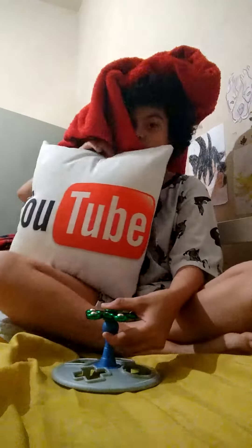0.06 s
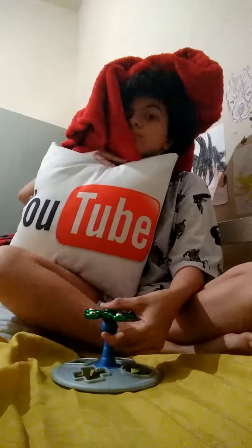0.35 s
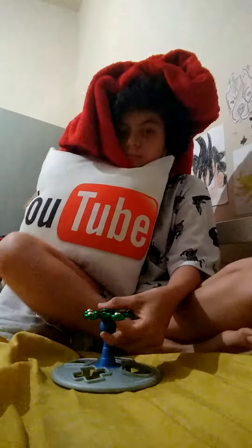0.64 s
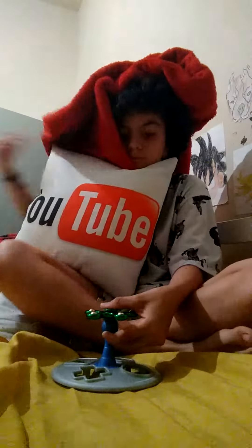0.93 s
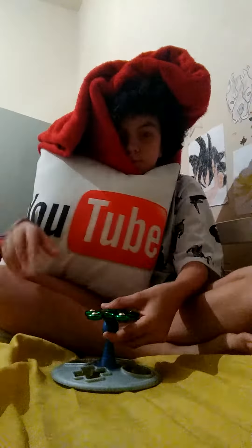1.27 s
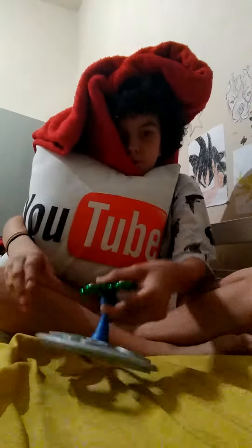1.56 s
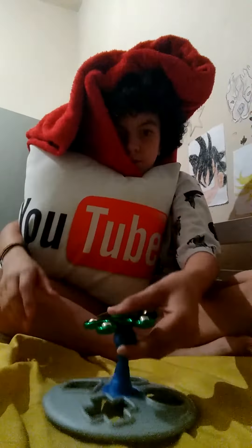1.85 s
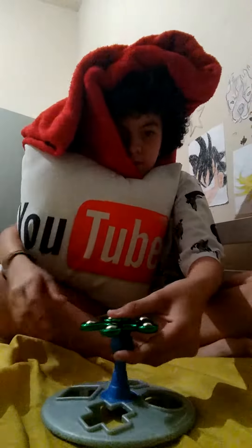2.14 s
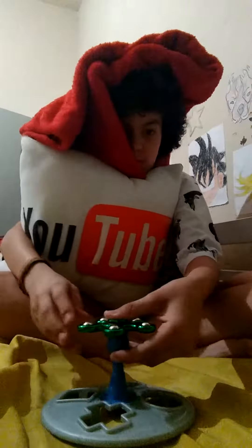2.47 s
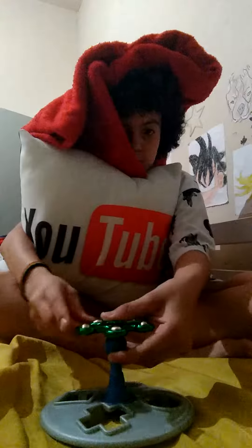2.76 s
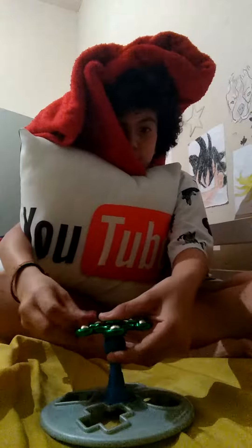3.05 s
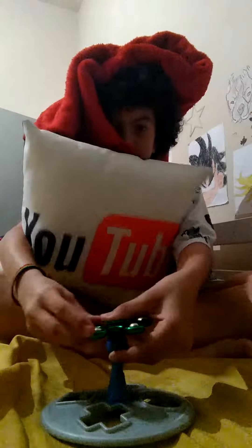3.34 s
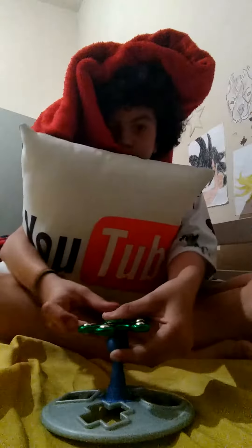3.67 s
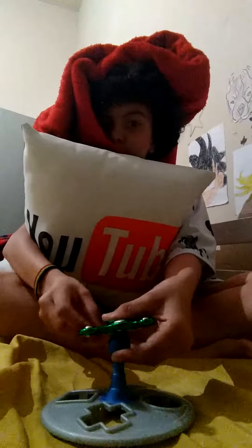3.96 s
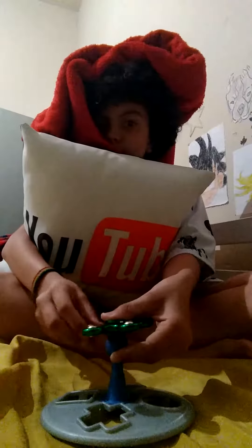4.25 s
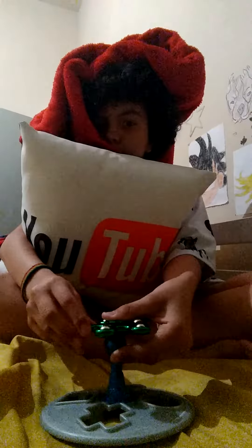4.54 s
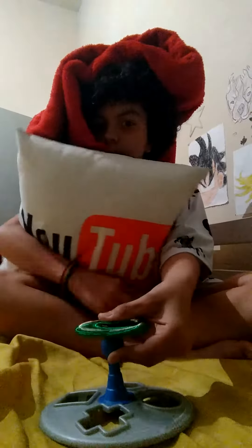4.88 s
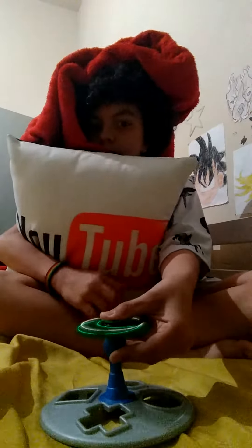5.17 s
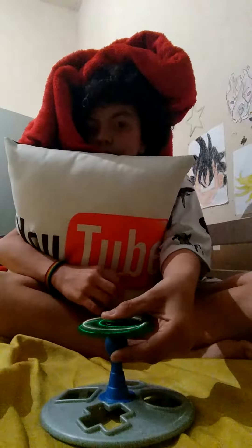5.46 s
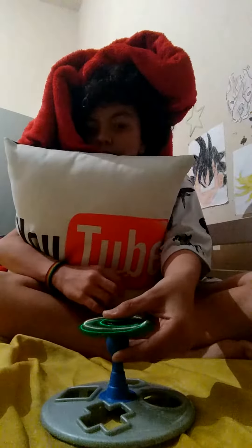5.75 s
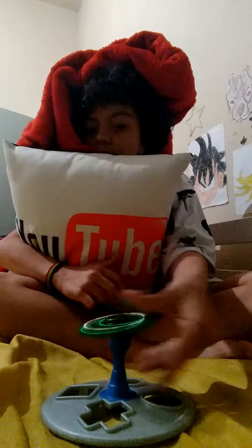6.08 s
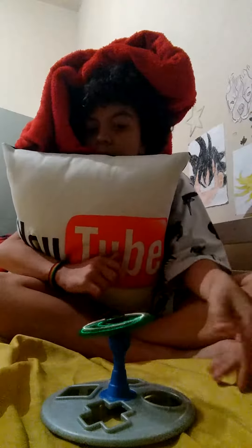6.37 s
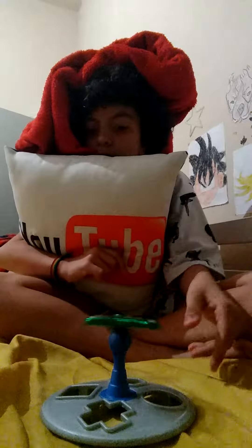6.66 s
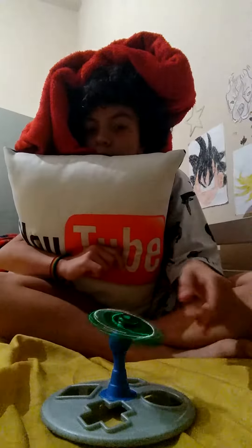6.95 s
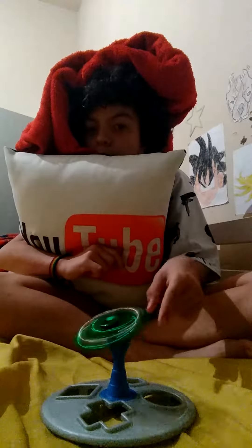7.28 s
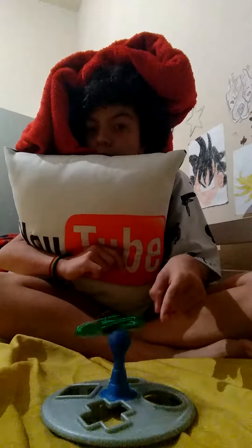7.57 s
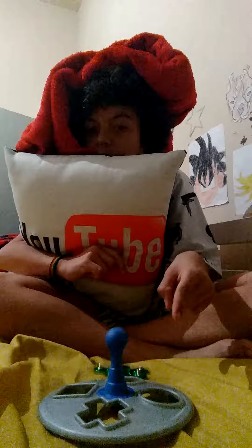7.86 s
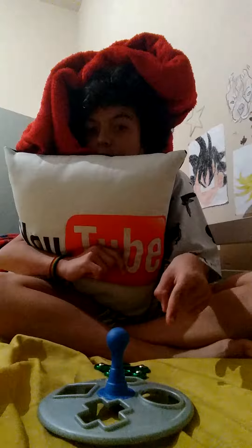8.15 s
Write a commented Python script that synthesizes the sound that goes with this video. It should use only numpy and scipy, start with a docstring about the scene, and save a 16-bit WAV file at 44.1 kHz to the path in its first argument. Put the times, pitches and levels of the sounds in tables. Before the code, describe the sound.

In a quiet bedroom with a faint hum, fabric rustles softly and fingers tick lightly on metal, with a few dull bumps. A flick sets a fidget spinner whirring, its bearing rattling with a thin steely ring. After about three seconds it rumbles, drops off its stand and bounces on the plastic base with sharp, loud clacks. The microphone is close.

```python
"""A metal fidget spinner whirrs on a plastic peg stand, on a bed in a quiet bedroom.
Cloth rustles and fingers tick on the metal, then a flick sets the ball bearing rattling and ringing.
Let go, the spinner leans, rumbles, slips off the peg and clacks onto the plastic base.
A phone close by spreads its one microphone to stereo with a short, inverted delay."""
import sys
import numpy as np
from scipy import signal
from scipy.fft import rfft, irfft, next_fast_len
from scipy.io import wavfile

SR = 44100
rng = np.random.default_rng(int(sys.argv[2]) if len(sys.argv) > 2 else 0)


def inscribe(sig):
    """Save sig as 16-bit PCM at rate SR to the path in sys.argv[1].

    A 1-D sig is mono; a 2-D sig holds one channel per row.
    Samples are clipped to [-1, 1] before scaling.
    """
    pcm = np.round(np.clip(np.atleast_2d(sig).T, -1, 1) * 32767)
    wavfile.write(sys.argv[1], SR, pcm.astype(np.int16))


N = 362502
T = np.arange(N) / SR
FLICK_S, FALL_S = 4.685, 7.575  # the spin starts; the spinner leaves the peg


def undb(db):
    """Decibels to gain."""
    return 10 ** (np.asarray(db) / 20)


def unit(x):
    """Scale to rms 1."""
    return x / np.sqrt(np.mean(x ** 2))


def curve(table):
    """Automation line through (time, value) points."""
    return np.interp(T, *np.transpose(table))


def colour(x, points):
    """EQ through (f/Hz, level/dB) points, falling 20 dB an octave beyond the ends."""
    hz, db = np.transpose(points)
    size = next_fast_len(len(x))
    f = np.maximum(np.fft.rfftfreq(size, 1 / SR), 1)
    gain_db = np.interp(np.log(f), np.log(hz), db)
    beyond = np.maximum(np.log2(hz[0] / f), 0) + np.maximum(np.log2(f / hz[-1]), 0)
    return irfft(rfft(x, size) * undb(gain_db - 20 * beyond), size)[:len(x)]


def resonate(x, hz, width):
    """One resonance, gain 1 at its centre."""
    return signal.lfilter(*signal.iirpeak(hz, hz / width, SR), x)


def walk(rate):
    """Random drift of rms 1, with `rate` new targets a second."""
    knots = rng.standard_normal(int(N / SR * rate) + 2)
    return unit(np.interp(T * rate, np.arange(len(knots)), knots))


def grains(rate, spread_db):
    """Tiny contacts of uneven size, about `rate` a second."""
    hits = rng.random(N) < rate / SR
    return unit(hits * rng.standard_normal(N) * undb(spread_db * rng.standard_normal(N)))


def burst(x, decay_s):
    """Let a sound die away from a starting rms of 1."""
    x = x * np.exp(-T[:len(x)] / decay_s)
    return x / np.sqrt(np.sum(x ** 2) / (decay_s * SR / 2))


def add(out, s, x):
    """Mix a short sound in at time s."""
    i = int(s * SR)
    out[i:i + len(x)] += x[:N - i]


# noise floor of the bedroom air: f/Hz, density/dB per Hz
AIR_SPECTRUM = [(25, -105), (60, -99), (100, -92), (160, -87), (250, -88), (350, -94), (600, -102),
                (1000, -105.5), (1800, -108), (3500, -107.3), (6000, -110), (9000, -113.5), (15000, -116)]
# appliance hum: f/Hz, level/dB
HUM_TONES = [(120.2, -66), (177.6, -68.5), (238.8, -64), (6420, -90)]
# a far-off tone that comes and goes: t/s, length/s, f/Hz, level/dB
FAR_SWELLS = [(.5, 0.4, 332, -63), (3.328, 0.47, 334, -65)]


def room_tone():
    """Faint air, the wavering hum of an appliance and a far-off tone."""
    out = colour(rng.standard_normal(N), AIR_SPECTRUM) * np.sqrt(SR / 2)
    for hz, db in HUM_TONES:
        out += np.sqrt(2) * undb(db + 1.2 * walk(7)) * np.sin(2 * np.pi * hz * T + .4 * walk(6))
    for s, length, hz, db in FAR_SWELLS:
        t = T[:int(length * SR)]
        add(out, s, np.sqrt(2) * undb(db) * np.sin(np.pi * t / length) * np.sin(2 * np.pi * hz * t))
    return out


# tone of the room's tail: f/Hz, level/dB
REVERB_EQ = [(60, 8), (180, 1.5), (500, -4), (1500, -6.5), (4000, -2.5), (8000, -6), (15000, -1)]


def bedroom(x, t60=.28, wet_db=-12, build_s=.011):
    """A small, padded room: the walls answer briefly."""
    t = T[:SR // 2]
    envelope = np.exp(-np.log(1000) * t / t60) * (1 - np.exp(-(t / build_s) ** 2))
    tail = colour(rng.standard_normal(len(t)), REVERB_EQ) * envelope
    return x + undb(wet_db) * signal.fftconvolve(x, tail / np.sqrt(np.sum(tail ** 2)))[:N]


# dull rub and bright swish of fabric: f/Hz, level/dB
RUB_EQ = [(50, -10.5), (130, -1), (330, 4), (600, 1), (1000, -7.5), (1500, -12.5), (3000, -26.5)]
SWISH_EQ = [(700, -11), (1800, 0.5), (3000, -3.5), (4500, -2.5), (6500, -10), (9000, -10.5), (15000, -19)]
# shifts of sleeves, pillow and blanket: centre t/s, length/s, rub level/dB, swish level/dB
CLOTH_MOVES = [(0.187, 0.23, -68, -66), (.365, 0.12, -60, -76), (0.676, 0.28, -63, -67),
               (0.827, .17, -66.5, -63.5), (1.15, 0.19, -63, -71), (1.53, .26, -70, -67.5),
               (1.774, 0.17, -60.5, -63.5), (2.075, 0.34, -69.5, -68.5), (2.43, 0.28, -64, -69.5),
               (3.04, .15, -61, -68), (3.24, 0.27, -58, -65.5), (3.534, 0.14, -61.5, -74),
               (3.78, .3, -68, -72.5), (4.76, .2, -58, -61), (7.82, 0.19, -58.5, -61),
               (8.17, 0.45, -66, -68)]


def cloth(stir_rub_db=-71.5, stir_swish_db=-75, still_s=3.9, settle_s=.2):
    """Fibres catch and slip as limbs shift, over a faint stirring that settles before the flick."""
    stir = undb(2 * walk(5)) * np.exp(-np.maximum(T - still_s, 0) / settle_s)
    rub_gain, swish_gain = stir * undb(stir_rub_db), stir * undb(stir_swish_db)
    for s, length, rub_db, swish_db in CLOTH_MOVES:
        swell = np.cos(np.pi * np.clip((T - s) / length, -.5, .5))
        rub_gain = np.hypot(rub_gain, swell * undb(rub_db))
        swish_gain = np.hypot(swish_gain, swell * undb(swish_db))
    rub = unit(colour(grains(2500, 2.9) * undb(-.5 * walk(40)), RUB_EQ))
    swish = unit(colour(grains(9000, 1.9), SWISH_EQ))
    return rub * rub_gain + swish * swish_gain


# soft bumps on stand and mattress: t/s, level/dB, f/Hz
BUMP_CUES = [(.55, -58, 260), (.859, -57, 264), (1.381, -58, 233), (1.728, -51.5, 387), (1.785, -50.5, 140),
             (1.928, -59, 167), (2.859, -54.5, 166), (2.972, -57.5, 160), (3.51, -56, 208),
             (4.705, -45, 142), (4.744, -40.5, 118), (4.906, -42.5, 204), (7.051, -41.5, 171),
             (7.472, -39.5, 165), (7.52, -43, 158), (7.795, -40.5, 186)]


def bumps(width_share=.48, rise_s=.0027, decay_s=.022):
    """Dull, padded knocks that swell and die within a few cycles."""
    out, t = np.zeros(N), T[:SR // 4]
    for s, db, hz in BUMP_CUES:
        width = hz * width_share
        shake = resonate(resonate(rng.standard_normal(len(t)), hz, width), hz, width)
        shake *= (1 - np.exp(-t / rise_s)) * np.exp(-t / decay_s)
        add(out, s, undb(db) * shake / np.sqrt(np.sum(shake ** 2) / (decay_s * SR)))
    return out


# ringing modes of spinner and stand: f/Hz, level/dB, t60/s
RING_MODES = [(953, -3, .11), (1260, -6, .08), (2270, -6, .1), (2735, -7, .12), (3540, -1, .1),
              (3978, -4, .12), (4330, -4, .13), (4770, -3, .1), (6200, -10, .12), (8750, -14, .12)]
# hollow knock of the plastic base: f/Hz, level/dB
BASE_EQ = [(250, -4), (450, 1), (650, -7), (850, -2), (1300, -4), (1700, -14.5), (2200, -3), (3000, -19),
           (5000, -7.5), (9000, -37)]


def impact(db, hz, octaves, decay_s, thud_db, knock_db):
    """One hit: a crack, ringing metal, a knock of the base, a thud as the stand rocks on the mattress."""
    def contact(f, skirt_db=-24, top_hz=10000):
        bell = np.exp(-.5 * (np.log2(f / hz) / octaves) ** 2)
        return (bell + undb(skirt_db)) / np.sqrt(1 + (f / top_hz) ** 6)

    t = T[:SR // 4]
    bins = np.maximum(np.fft.rfftfreq(len(t), 1 / SR), 1)
    grit = unit(irfft(rfft(rng.standard_normal(len(t))) * contact(bins), len(t)))
    chatter = undb(-19) * grit * np.exp(-t / .006)  # the loose bearing buzzes on briefly
    crack = burst(grit, decay_s) + chatter
    ring = np.zeros(len(t))
    for mode_hz, mode_db, t60 in RING_MODES:
        gain = undb(mode_db + 2 * rng.standard_normal()) * contact(mode_hz)  # each hit lands elsewhere
        ring += gain * np.sin(2 * np.pi * (mode_hz * t + rng.random())) * np.exp(-np.log(1000) * t / t60)
    ring *= undb(-25) * np.sqrt(decay_s / .002 / len(RING_MODES))  # a longer push rings harder
    knock = burst(colour(rng.standard_normal(len(t)), BASE_EQ), decay_s=.004)
    thud = np.sin(2 * np.pi * 185 * t) * (1 - np.exp(-t / .003)) ** 2 * np.exp(-t / .0024)
    thud /= np.max(np.abs(thud))
    return undb(db) * (crack + ring) + undb(knock_db) * knock + undb(thud_db) * thud


# fingers touching the spinner: t/s, level/dB, contact f/Hz, knock level/dB
TICK_CUES = [(1.378, -50, 3780, -80), (1.3947, -45, 3300, -68), (1.44, -55, 2400, -53),
             (1.762, -55, 1900, -55), (2.931, -47, 2600, -66), (3.705, -62, 12000, -85),
             (5.768, -49, 10000, -70), (5.933, -38.5, 2800, -52), (5.97, -46, 11000, -70)]


def finger_ticks():
    """Fingers tap the metal: light, short hits."""
    out = np.zeros(N)
    for s, db, hz, knock_db in TICK_CUES:
        add(out, s, impact(db, hz, octaves=.6, decay_s=.0015, thud_db=-63, knock_db=knock_db))
    return out


# hits on peg and base: t/s, level/dB, contact f/Hz, width/octaves, decay/s, thud level/dB, knock level/dB
CLACK_CUES = [(6.232, -49, 3000, 1, .002, -41, -47), (7.5729, -26.5, 3540, 0.41, 0.0038, -32, -36),
              (7.5776, -28, 4170, 1, .003, -15, -30), (7.5923, -4.5, 5280, 1.8, 0.00041, -23.5, -23.5),
              (7.6186, -11.5, 3960, 0.66, 0.0032, -23.5, -21), (7.699, -40, 3470, 1.3, 0.0021, -34.5, -32),
              (7.7119, -9.5, 2330, .3, 0.0016, -33, -13), (7.7178, -24.5, 3600, 1, .002, -21, -31.5),
              (7.7274, -21.5, 2950, 0.44, 0.00066, -39, -25.5),
              (7.736, -27, 3790, 0.66, 0.00685, -39.5, -33)]


def clacks():
    """The spinner knocks once while turning, then drops off the peg and bounces on the base."""
    out = np.zeros(N)
    for s, *hit in CLACK_CUES:
        add(out, s, impact(*hit))
    return out


def spinning(rise_s=.039, run_out_s=.04):
    """Envelope of the spin: fast attack at the flick, a hold, a short release after the fall."""
    return np.clip((T - FLICK_S) / rise_s, 0, 1) * np.exp(-np.maximum(T - FALL_S, 0) / run_out_s)


def slowing(per_s):
    """Share that friction has left since the flick."""
    return np.exp(-per_s * np.maximum(T - FLICK_S, 0))


def moan(start_hz=1031, db=-63):
    """A rough, narrow resonance inside the whirr glides down as the spinner slows."""
    phase = 2 * np.pi * np.cumsum(start_hz * slowing(per_s=.56)) / SR
    band = walk(130) * np.sin(phase) + walk(130) * np.cos(phase)
    return band * undb(db) * spinning()


# resonances of the steel races, ring first, then sizzle: f/Hz, nominal width/Hz, relative level/dB
RACE_MODES = [(4160, 210, 4.5), (7700, 410, -5.5), (12150, 370, 1.5), (12250, 1540, -6.5),
              (15000, 510, 0.5)]


def races(load, ring_db, sizzle_db):
    """Ticking balls excite the races: one steely ring with a sizzle above it."""
    ticks = grains(5000, 1.4) * load * undb(.4 * walk(80))
    ring, *sizzle = (undb(db) * resonate(resonate(ticks, hz, width * 1.75), hz, width * 2.2)
                     for hz, width, db in RACE_MODES)
    return unit(ring) * undb(ring_db) + unit(sum(sizzle)) * undb(sizzle_db)


# bearing rattle when pinched and when free, its hollow body and its rumble: f/Hz, level/dB
HELD_EQ = [(900, -14), (1400, -27), (1700, -10), (2200, -5.5), (2750, -1), (3400, -3.5), (4100, -6),
           (5000, -12.5), (6300, -19.5), (8500, -19.5), (11000, -24.5)]
FREE_EQ = [(900, -27), (1350, -9.5), (1700, -6.5), (2050, 0.5), (2500, -7.5), (3500, -6), (4400, -4),
           (5100, -8.5), (6200, -13.5), (8800, -11.5), (11000, -24)]
HOLLOW_EQ = [(200, -5), (330, 2), (480, -0.5), (680, 2), (850, 2.5), (1050, -6), (1400, -9.5),
             (2200, -38.5)]
RUMBLE_EQ = [(30, -25), (70, -18.5), (110, -1.5), (165, 1.5), (230, -0.5), (300, -9.5), (450, -30),
             (900, -50)]
# fingers pinch the bearing cap, then let go: t/s, grip/0-1
GRIP_CURVE = [(4.7, 0), (5.0, 0.96), (5.6, .97), (6.0, 0.31), (6.5, 0.1)]
# how hard the bearing rattles: t/s, level/dB
WHIRR_CURVE = [(4.73, -58.5), (5.07, -50), (5.19, -53), (5.71, -53), (5.75, -56), (6.0, -52), (6.22, -65),
               (6.25, -53), (6.34, -54.5), (6.51, -61.5), (6.64, -57), (7.43, -59), (7.45, -56),
               (7.54, -60)]
# mix of rattle, hollow body, ring, sizzle and rumble, a row each:
# level/dB at the usual whirr, tracking/dB per dB of whirr, full-grip gain/dB, full-lean gain/dB
LAYER_MIX = [(-53.5, 0.94, .5, 0), (-58, .7, 0, 0), (-59.5, .9, -7.5, -1), (-57.3, .5, -5.5, 2),
             (-54, 0.24, 0, 8)]


def spinner(turns_per_s=18.6, usual_whirr_db=-56, lean_s=.2, throb_db=.95, flutter_db=1.1):
    """Balls tick round the bearing, loaded twice a turn; grip damps the ring, lean lifts the rumble."""
    grip = curve(GRIP_CURVE)
    whirr_db = curve(WHIRR_CURVE) - usual_whirr_db
    lean = np.exp(np.minimum(T - FALL_S, 0) / lean_s)  # grows until the fall
    rattle_db, hollow_db, ring_db, sizzle_db, rumble_db = (
        db + tracking * whirr_db + grip_db * grip + lean_db * lean
        for db, tracking, grip_db, lean_db in LAYER_MIX)
    hollow_db += 1.47 * walk(12)
    rumble_db += walk(12)
    speed = turns_per_s * slowing(per_s=.08) * (1 + .02047 * walk(9))
    angle = 2 * np.pi * np.cumsum(speed) / SR
    load = undb(throb_db * np.sin(2 * angle) + .6 * np.sin(angle) + flutter_db * walk(90))
    balls = grains(12000, 2.04) * load
    held = unit(colour(balls, HELD_EQ))
    free = unit(colour(grains(12000, 1) * load, FREE_EQ))
    rattle = (np.sqrt(grip) * held + np.sqrt(1 - grip) * free) * undb(rattle_db)
    hollow = unit(colour(balls, HOLLOW_EQ)) * undb(hollow_db)
    steel = races(load, ring_db, sizzle_db)
    # balls passing a rough spot in the race shake the stand at a wandering pitch
    passing = np.sin(9.7 * angle + 2.1 * walk(35))
    rumble = unit(unit(colour(balls, RUMBLE_EQ)) + .22 * passing) * undb(rumble_db)
    return spinning() * (rattle + hollow + steel + rumble)


# tone of the delayed left channel: f/Hz, level/dB, extra lag/rad
LEFT_EQ = [(30, 0, .1), (110, -.4, .24), (260, .4, .26), (480, -2, -.1), (720, -3, 0), (1000, 0, 0),
           (1350, 2, 0), (1650, 0, 0)]


def scene(delay_s=27 / 48000):
    """One microphone hears it all; left is the right channel delayed, inverted and lightly coloured."""
    sources = spinner() + moan() + cloth() + bumps() + finger_ticks() + clacks()
    mic = bedroom(sources) + room_tone()
    size = next_fast_len(N + SR // 10)
    f = np.fft.rfftfreq(size, 1 / SR)
    hz, db, lag = np.transpose(LEFT_EQ)
    phase = 2 * np.pi * f * delay_s + np.interp(f, hz, lag)
    spread = -undb(np.interp(f, hz, db)) * np.exp(-1j * phase)
    left = irfft(rfft(mic, size) * spread, size)[:N]
    return np.array([left, mic])


def record(dry):
    """The phone soft-clips the loudest peaks and cuts the top above 15.6 kHz."""
    rounded = dry / (1 + (dry / .72) ** 4) ** .25
    return signal.sosfilt(signal.ellip(10, .2, 70, 15600, fs=SR, output="sos"), rounded)


dry = scene()
out = record(dry)
inscribe(out)
```